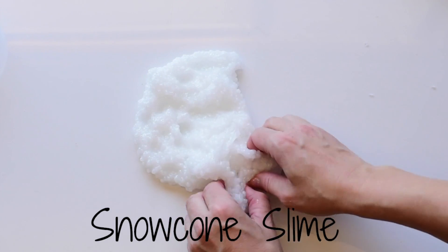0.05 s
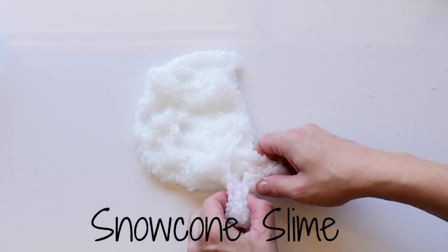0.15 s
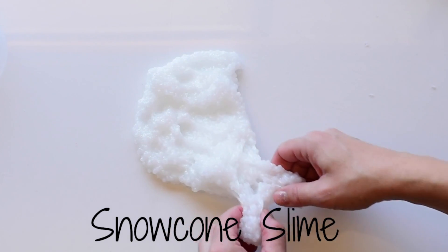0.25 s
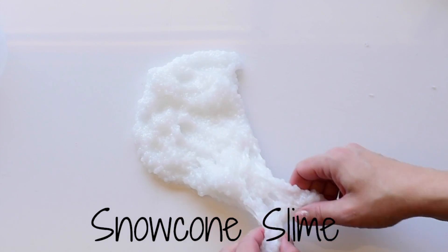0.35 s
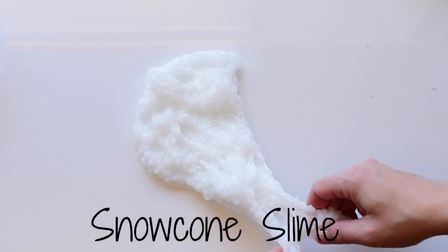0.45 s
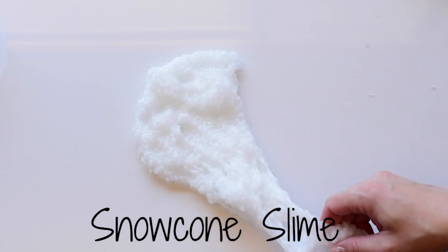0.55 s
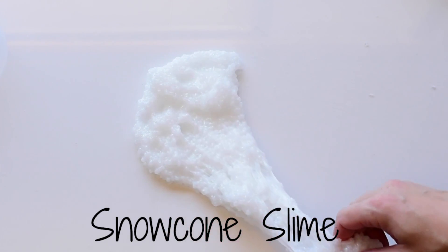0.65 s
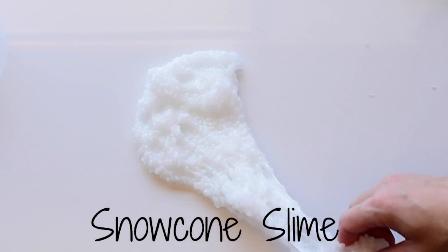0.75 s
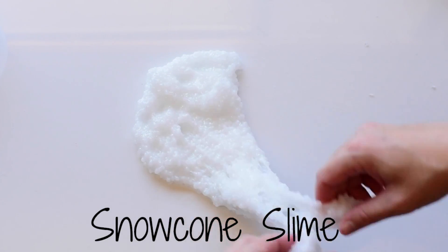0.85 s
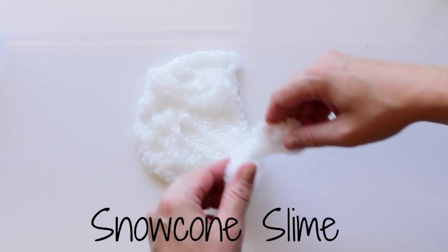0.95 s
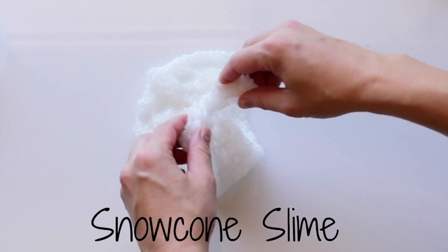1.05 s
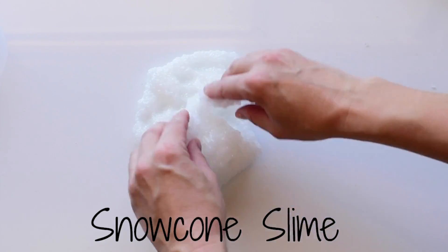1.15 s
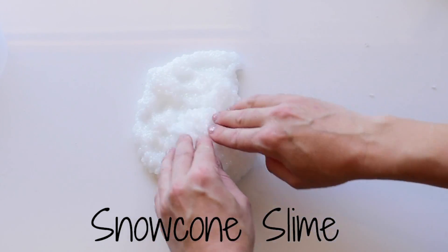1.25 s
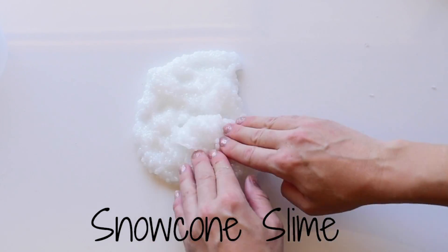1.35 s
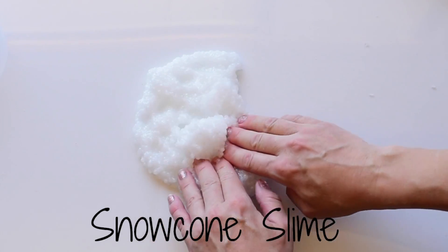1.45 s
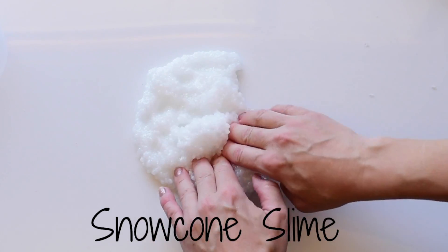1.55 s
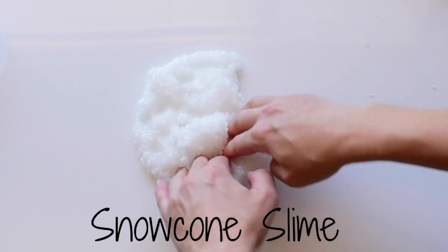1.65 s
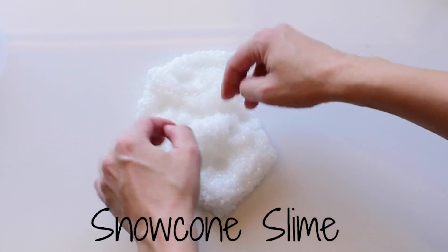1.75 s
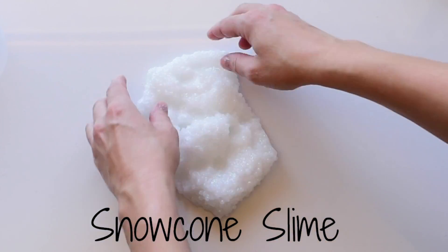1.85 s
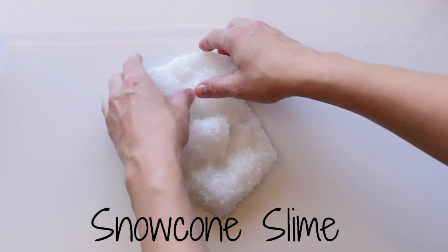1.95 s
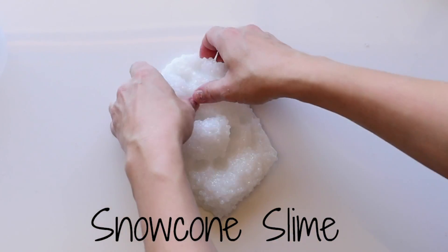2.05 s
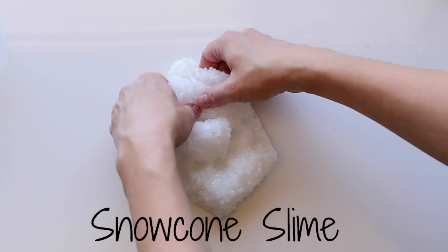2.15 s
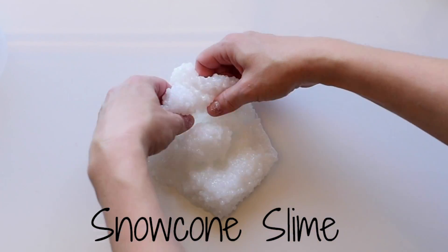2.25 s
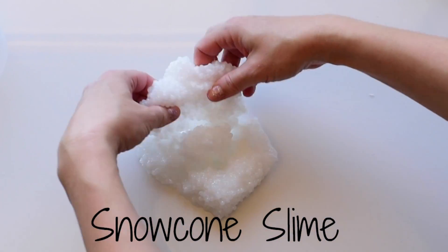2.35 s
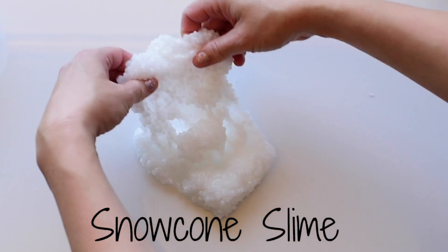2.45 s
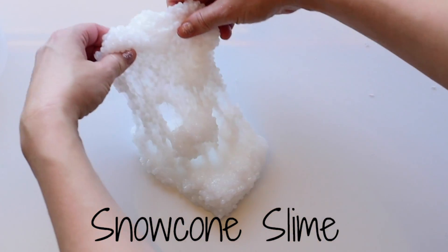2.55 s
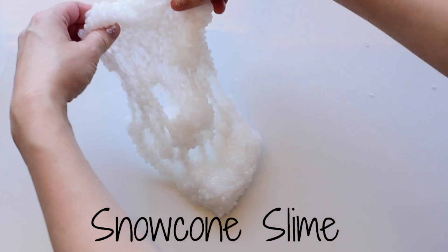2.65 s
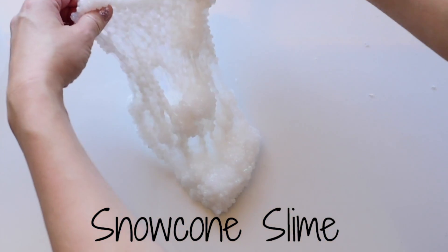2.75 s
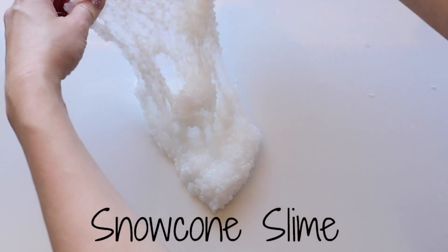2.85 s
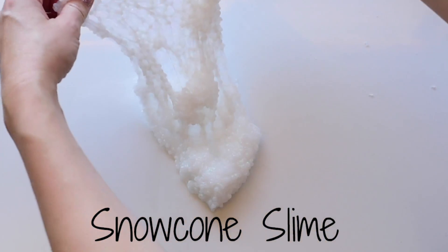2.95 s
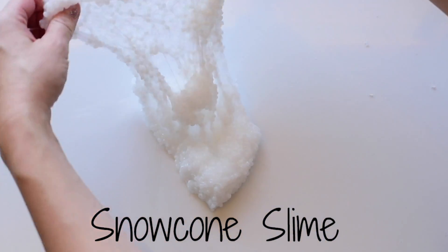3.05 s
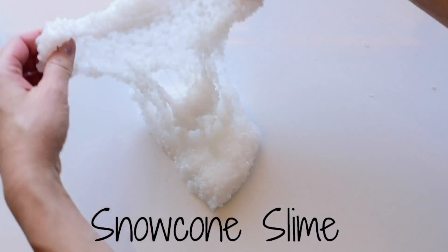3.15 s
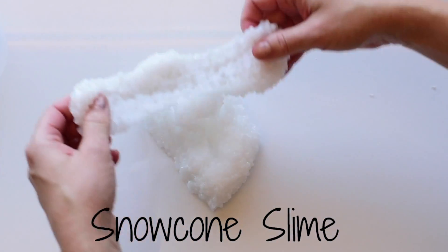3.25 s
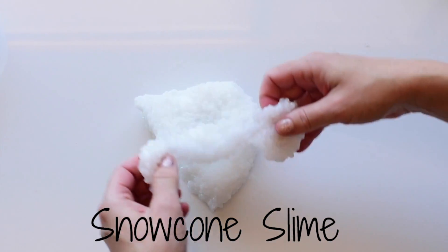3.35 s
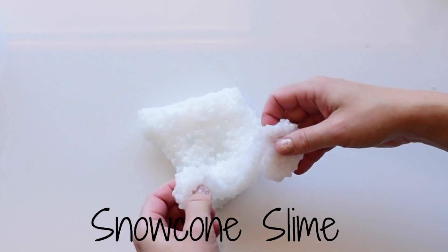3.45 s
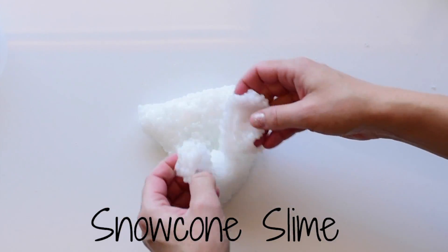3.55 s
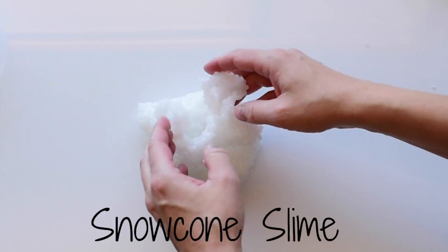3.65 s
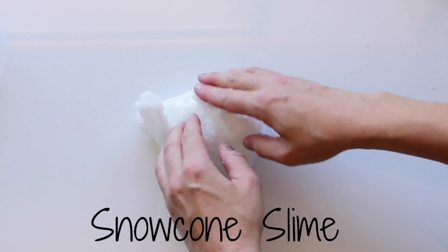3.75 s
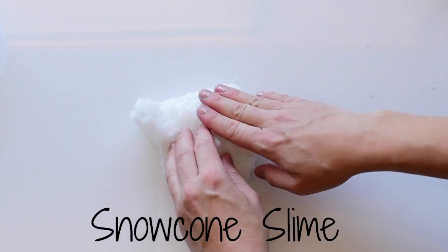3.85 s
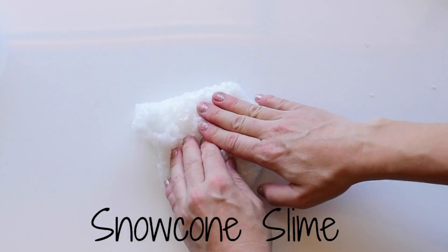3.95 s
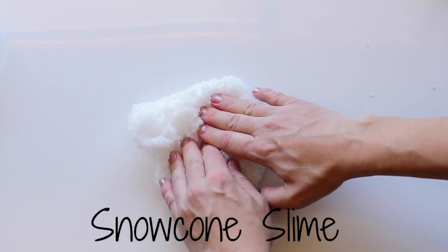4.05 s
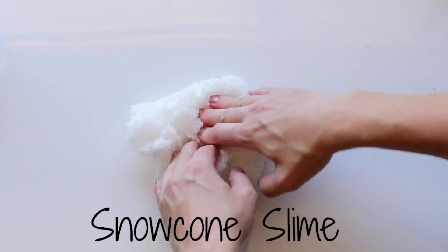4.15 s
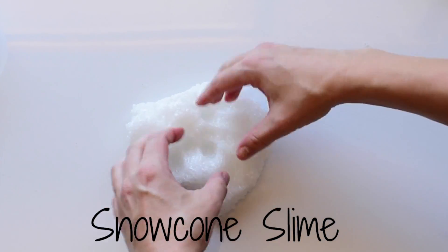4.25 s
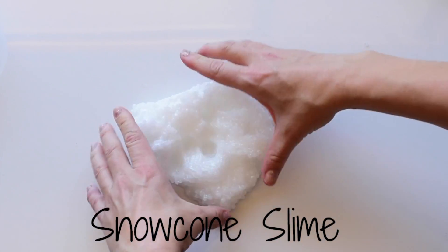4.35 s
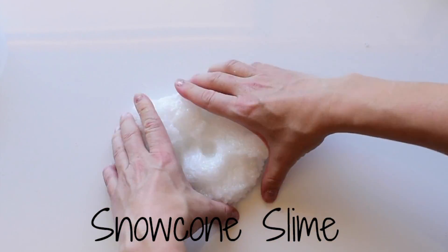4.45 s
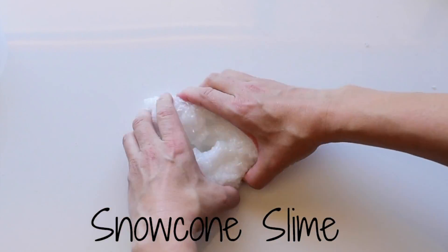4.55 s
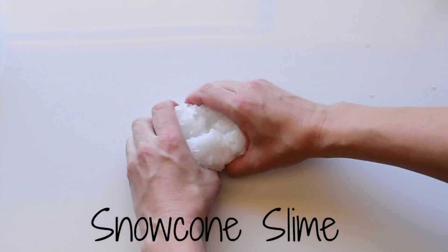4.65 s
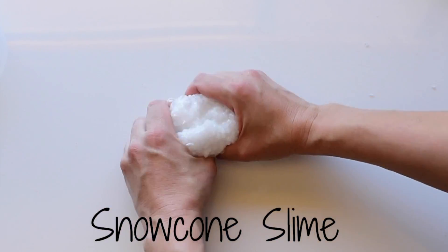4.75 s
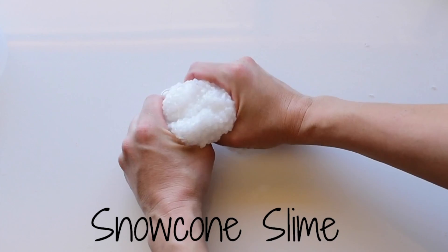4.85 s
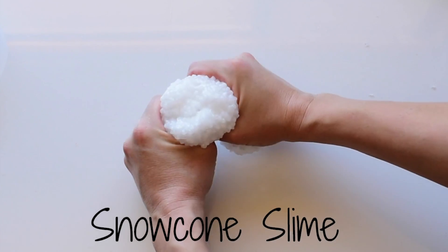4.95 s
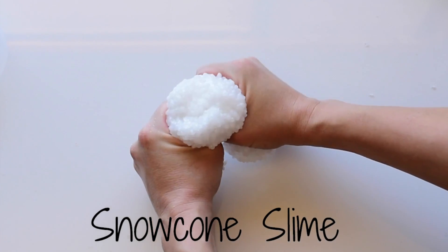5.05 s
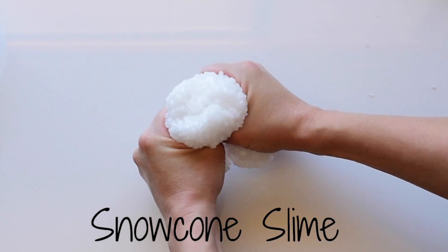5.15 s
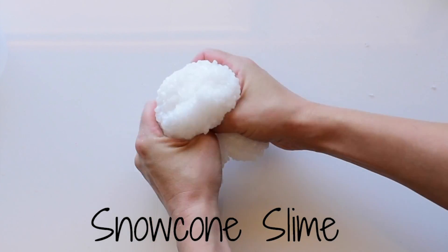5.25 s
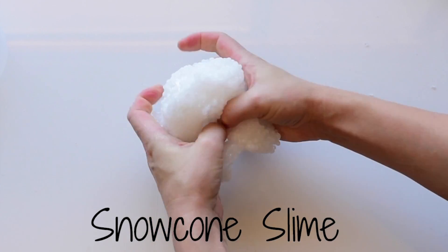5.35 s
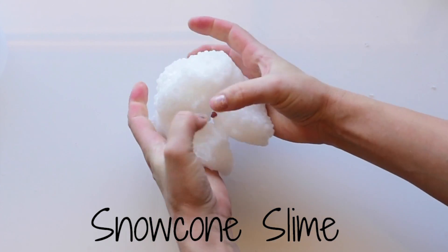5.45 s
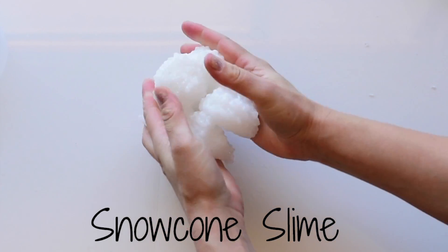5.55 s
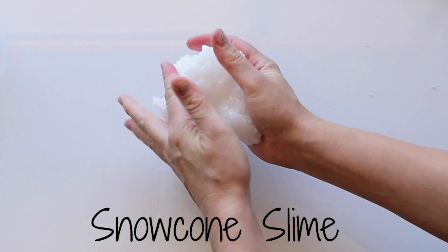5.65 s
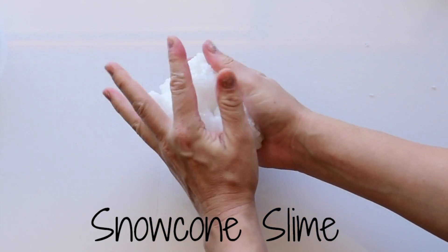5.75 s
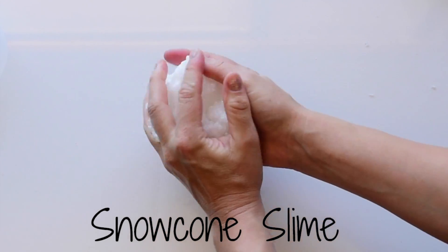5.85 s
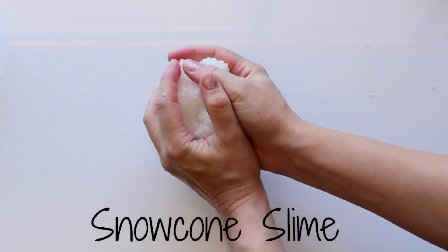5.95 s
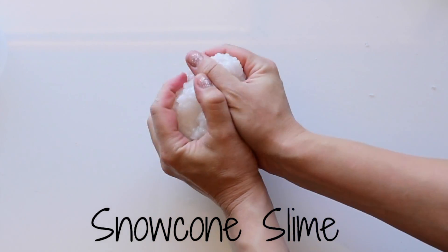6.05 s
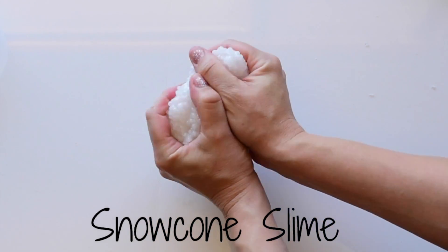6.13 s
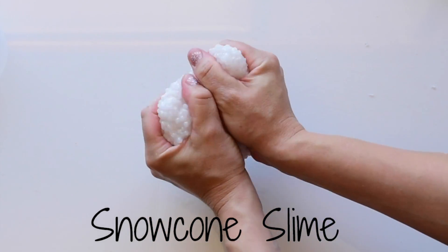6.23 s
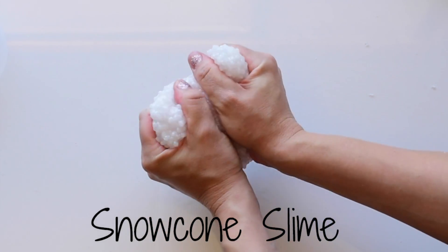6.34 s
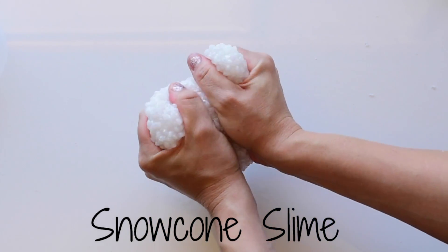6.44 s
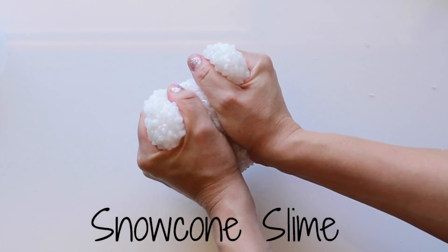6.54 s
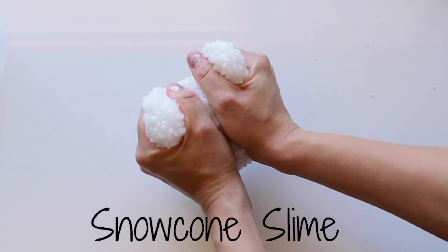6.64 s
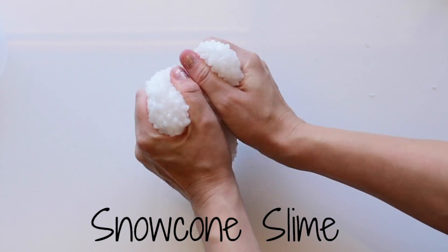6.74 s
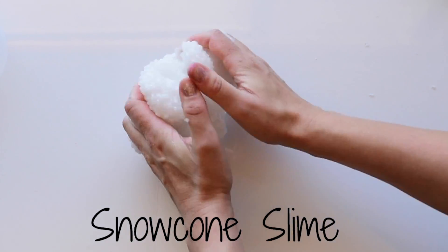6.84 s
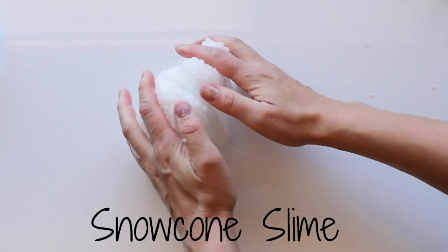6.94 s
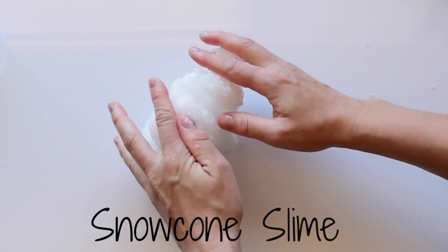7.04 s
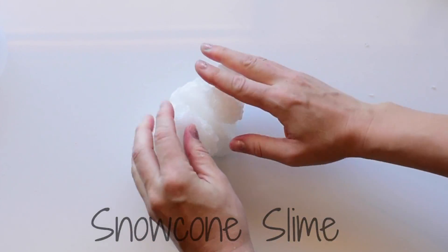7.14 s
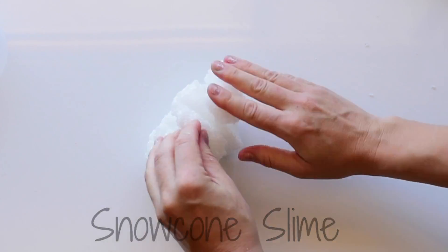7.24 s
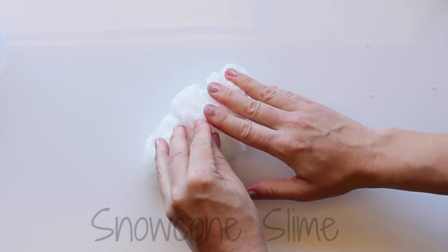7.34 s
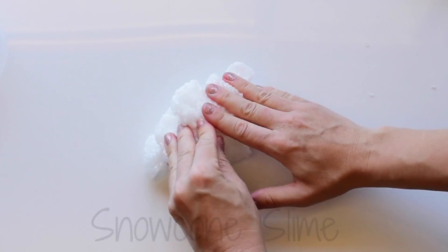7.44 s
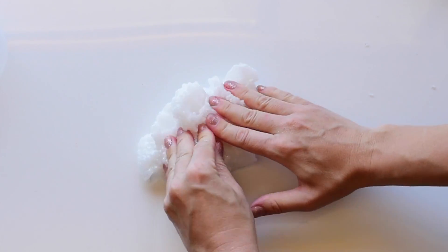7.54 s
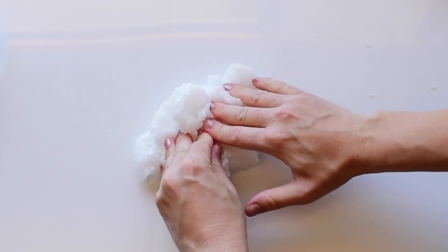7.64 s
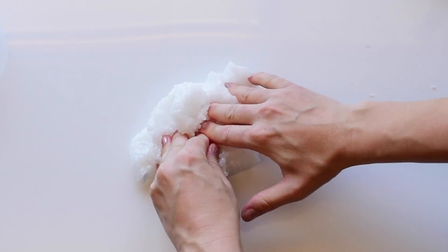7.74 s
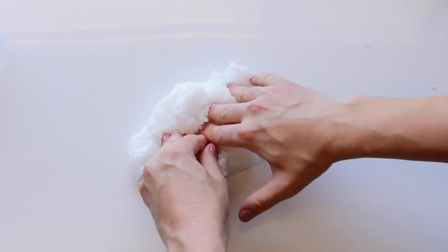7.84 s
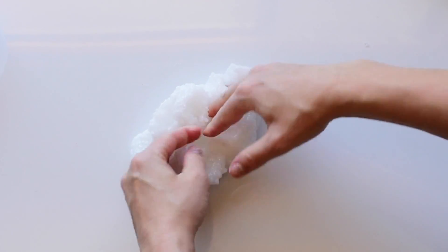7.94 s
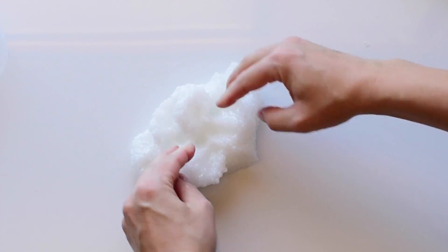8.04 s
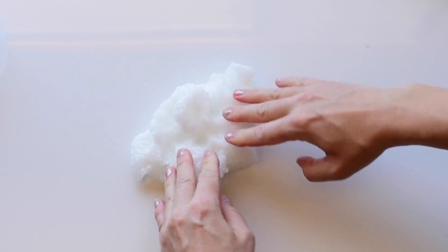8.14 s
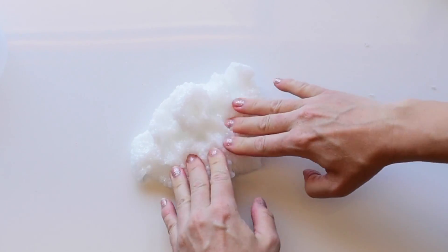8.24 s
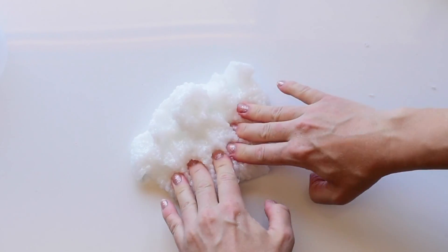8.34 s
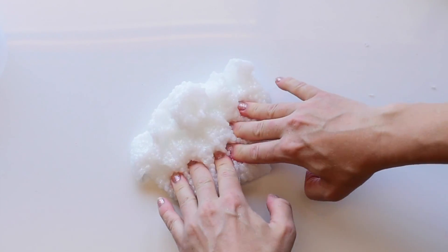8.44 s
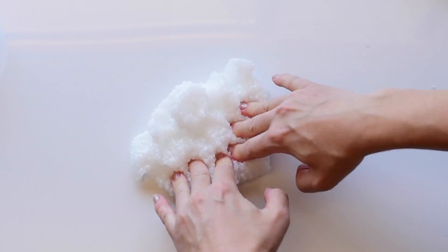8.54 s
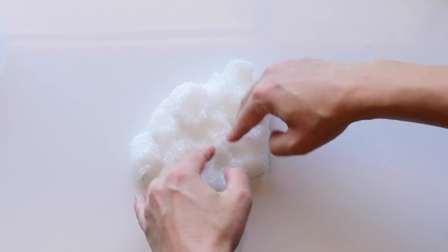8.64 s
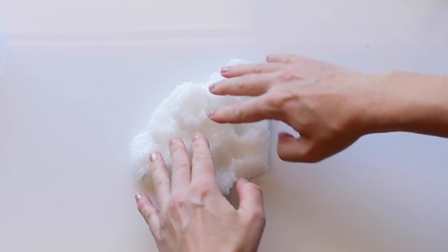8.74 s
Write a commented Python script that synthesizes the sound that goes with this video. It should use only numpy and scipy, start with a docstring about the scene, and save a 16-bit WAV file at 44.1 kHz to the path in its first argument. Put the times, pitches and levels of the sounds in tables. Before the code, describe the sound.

Hands stretch and squeeze crunchy bead-filled slime close up, with fine crackles, sharp snaps and wet squelches peaking in a loud burst midway.

```python
"""On a table in a small, hard room, two hands stretch, fold and squeeze a lump of crunchy, bead-filled slime.
Random clicks through damped resonances make the crackle of tiny air cells and a lower, wet squelch.
Bigger cells snap as rung bursts of noise, trapped pockets burst, air fizzes in and hands knock on the table.
A close stereo microphone adds hiss and bends the peaks; room noise, echo and a faint hum lie behind."""
import sys
import numpy as np
from scipy import signal
from scipy.fft import rfft, irfft
from scipy.io import wavfile
from scipy.ndimage import uniform_filter1d

SR = 44100
rng = np.random.default_rng(int(sys.argv[2]) if len(sys.argv) > 2 else 0)


def inscribe(sig):
    """Save sig as 16-bit PCM at rate SR to the path in sys.argv[1].

    A 1-D sig is mono; a 2-D sig holds one channel per row.
    Samples are clipped to [-1, 1] before scaling.
    """
    pcm = np.round(np.clip(np.atleast_2d(sig).T, -1, 1) * 32767)
    wavfile.write(sys.argv[1], SR, pcm.astype(np.int16))


N = 387638
TIME = np.arange(N) / SR

# strokes of the hands: (greatest effort [s], build-up [s], let-go [s], crackle level before trim [dB],
# wet squelch relative to the crackle [dB])
HAND_STROKES = [(0.03, .15, 0.16, -40.5, -13), (0.208, 0.2, 0.23, -39, -5), (0.88, .04, .06, -60, -12.5),
                (1.569, 0.232, 0.18, -44, -12), (1.768, .035, 0.032, -32.5, -16.5),
                (2.248, 0.28, .33, -30.5, -11), (2.589, 0.29, 0.32, -40.5, -7.5),
                (3.38, .05, 0.1, -56, -25.5), (3.72, 0.16, 0.22, -52, -10.5), (4.07, 0.18, 0.3, -42, -12.5),
                (4.271, 0.13, .08, -38, -10.5), (4.629, 0.088, 0.23, -32, -5.5),
                (4.771, 0.098, 0.27, -28.5, -11.5), (5.005, 0.1, .17, -17, -18.5),
                (5.13, 0.11, 0.078, -20.5, -22), (5.368, 0.12, 0.2, -36, -7.5),
                (5.66, 0.055, 0.057, -50, -4), (5.92, .25, .3, -48.5, -14), (6.23, 0.15, 0.18, -30, -13.5),
                (6.48, .13, 0.257, -34, -13), (6.67, .06, 0.064, -41.5, -13.5), (6.848, .09, .17, -33, -8),
                (7.42, 0.046, .05, -48.5, -13), (7.57, 0.055, 0.13, -44, -10),
                (7.78, 0.18, 0.12, -44.5, -13), (8.025, 0.095, 0.072, -35, -10), (8.38, 0.16, .24, -49, -9),
                (8.685, 0.057, 0.065, -34, -16)]
STROKE_DROP_DB, STROKE_CURVE = 22, 1.64  # fall over a build-up or let-go; 1 is a pointed peak, 2 a round one
RESTING_DB, RESTING_WET_DB = -66, -4.5  # the slime keeps settling between strokes
# outline of the dry crackle: (frequency [Hz], relative level [dB])
CRACKLE_SPECTRUM = [(500, -4.5), (2500, -7.5), (4800, -6.5), (6500, 1), (9800, 2), (12000, -3.5),
                    (15000, -10.5), (17000, -38)]
# outline of the wet squelch: (frequency [Hz], relative level [dB])
SQUELCH_SPECTRUM = [(100, -8), (280, -7), (700, -0.5), (1500, -2), (2600, -3), (4500, -3), (9000, -34.5)]
# low noise of the room: (frequency [Hz], relative level [dB])
ROOM_NOISE_SPECTRUM = [(20, -15.5), (50, -5), (100, -2), (280, -1), (430, -6.5), (560, -7.5), (720, -12.5),
                       (900, -15.5), (1700, -14), (3000, -32.5), (8000, -47)]
# thin hiss of the microphone: (frequency [Hz], relative level [dB])
MIC_HISS_SPECTRUM = [(4000, -12.5), (7500, -12.5), (9500, -4), (10170, 5.5), (10700, -9.5), (11600, -9.5),
                     (14000, -20), (16000, -31.5)]
ROOM_NOISE_DB, MIC_HISS_DB = -60.5, -57.5
# hands bump the table through the slime: (time [s], level before trim [dB], hardness [dB])
HAND_BUMPS = [(.01, -54, -6), (1.76, -48.5, 2.5), (1.963, -38, 13), (1.973, -35.5, -0.5),
              (2.076, -44.5, 10), (2.2, -43, -22), (2.259, -53.5, -4), (4.264, -51, -10),
              (4.502, -48.5, -13.5), (4.608, -45.5, -21.5), (6.911, -48.5, -15), (8.029, -49.5, -1),
              (8.698, -50, -1)]
# ring of the table: (frequency [Hz], level before hardness [dB], fall by 60 dB [s])
TABLE_MODES = [(74, -4.5, 0.1), (95.7, -2.5, 0.12), (126, 0.5, 0.061), (241, 1.5, 0.1), (375, -6.5, 0.055),
               (600, 8.5, 0.012), (657, -1, 0.027), (1200, -28, 0.0086)]
# the loudest air cells that snap: (time [s], level before trim and pan [dB], pitch [Hz])
LOUD_SNAPS = [(0.0312, -39, 6700), (0.1454, -35, 8370), (0.2332, -27.5, 9300), (0.2743, -30, 8850),
              (0.3499, -36, 7540), (0.4472, -40, 8500), (1.4803, -41, 5460), (1.5531, -35, 7800),
              (1.5875, -29, 7800), (1.7525, -31.5, 8100), (2.1387, -28, 6800), (2.3635, -17.5, 9600),
              (2.6021, -32.5, 5850), (2.6975, -36, 6600), (2.908, -44, 7000), (3.646, -41.5, 7700),
              (4.0022, -34, 7100), (4.067, -26.5, 6640), (4.1604, -32, 6460), (4.5315, -37.5, 8450),
              (4.6189, -28, 4140), (4.7488, -20.5, 7000), (4.7766, -20, 7200), (4.9293, -15, 6000),
              (4.9604, -16.5, 6800), (4.9848, -10, 8000), (4.9929, -12, 9000), (5.044, -10, 9800),
              (5.1104, -22, 6800), (5.1206, -18, 7600), (5.1257, -20, 7400), (5.1701, -10.5, 8900),
              (5.5689, -34, 7800), (6.1435, -25.5, 8550), (6.1588, -32, 8900), (6.2068, -26, 9300),
              (6.2518, -26, 9100), (6.2734, -20, 7800), (6.3852, -26.5, 10400), (6.4199, -14, 9500),
              (6.8393, -27, 7300), (6.9023, -40, 7100), (7.3982, -42.5, 7000), (7.4935, -32, 8300),
              (7.5322, -33.5, 6900), (7.5679, -36, 9550), (7.6813, -28.5, 8300), (7.8533, -35, 9650),
              (7.8885, -28, 8240), (8.0278, -25.5, 7200), (8.0435, -30, 9200), (8.3523, -27.5, 8900),
              (8.3708, -34, 10600), (8.4017, -35.5, 10500), (8.4488, -34.5, 7700), (8.4696, -35, 7800),
              (8.6713, -30, 7600)]
# the room's echo: (frequency [Hz], level relative to the direct sound [dB], fall by 60 dB [s],
# likeness of left and right [0-1])
ROOM_BANDS = [(146, -2.5, 0.97, 0.97), (500, -3, 0.17, 0.87), (1340, -2.5, 0.42, 0.3), (2450, -2, 0.32, 0),
              (6000, -5, 0.39, 0.55), (9500, -3, 0.24, 0.2), (13800, -1, 0.19, 0.5)]
# trapped air pockets that burst: (time [s], level before trim [dB], pitch [Hz])
POCKET_BURSTS = [(1.284, -49.5, 2440), (1.515, -40, 2200), (2.666, -37, 1830), (2.749, -52, 1690),
                 (2.806, -45.5, 1480), (4.072, -32.5, 2070), (4.619, -52, 2000), (4.749, -25, 1900),
                 (5.0604, -22, 1200), (5.0682, -15.5, 2800), (6.1737, -19, 490), (6.207, -25, 830),
                 (6.273, -26.5, 980), (6.42, -30.5, 1200)]
# air sucked in as the slime peels off the skin:
# (middle [s], spread [s], level before the jerks [dB], pitch [Hz])
AIR_SUCKS = [(2.268, 0.0075, -38, 2760), (4.704, 0.082, -47, 2850), (5.361, 0.011, -37, 2450),
             (6.807, 0.0098, -42, 2500)]
# a faint hum that comes and goes: (middle [s], spread [s], level [dB], pitch [Hz])
HUM_SWELLS = [(3.455, 0.25, -73, 693), (4.416, 0.05, -62, 663)]
# the lump is held above the table: (from [s], to [s])
LIFTED_SPAN = (4.7, 6.95)
TOP_HZ = 16100  # the recorder's upper limit


def undb(db):
    """Decibels to gain."""
    return 10 ** (np.asarray(db) / 20)


def unit(x):
    """Scale to an rms of one."""
    return x / np.sqrt(np.mean(x ** 2))


def walk(rate):
    """Random wander with a spread near one, taking `rate` new values a second."""
    knots = rng.standard_normal(int(rate * N / SR) + 2)
    return np.interp(TIME * rate, np.arange(len(knots)), knots)


def swell(s, spread_s, db):
    """A smooth bell-shaped rise and fall around time s."""
    return undb(db) * np.exp(-.5 * ((TIME - s) / spread_s) ** 2)


def stereo_noise(likeness, size):
    """White noise that is partly shared by left and right."""
    mid, side = rng.standard_normal((2, size))
    c = np.clip(likeness, 0, 1)
    return np.sqrt((1 + c) / 2) * mid + np.sqrt((1 - c) / 2) * np.array([side, -side])


def colour(x, spectrum):
    """Causal (minimum-phase) filter with the given frequency and dB outline."""
    size = 4096
    hz, db = np.transpose(spectrum)
    grid = np.maximum(np.fft.rfftfreq(size, 1 / SR), 1)
    cepstrum = irfft(np.log(undb(np.interp(np.log(grid), np.log(hz), db))))
    # folding the cepstrum puts the energy as early as possible
    cepstrum[1:size // 2] *= 2
    cepstrum[size // 2 + 1:] = 0
    response = irfft(np.exp(rfft(cepstrum)))
    return signal.fftconvolve(x, response[None], axes=1)[:, :N]


def resonate(x, hz, width_hz):
    """Two-pole resonance; a wider one dies away sooner."""
    hz, width_hz = min(hz, .45 * SR), min(width_hz, .3 * SR)
    return signal.lfilter(*signal.iirpeak(hz, hz / width_hz, fs=SR), x)


def panned(x, pan_db):
    """Place a sound by its left minus right level."""
    return x * undb(np.array([[.5], [-.5]]) * pan_db)


def add(out, s, sound):
    """Mix a sound in at time s."""
    start = max(int(s * SR), 0)
    out[:, start:start + sound.shape[-1]] += sound[..., :max(N - start, 0)]


def effort():
    """Each stroke builds up and lets go; returns the crackle level and the squelch relative to it, in dB."""
    t = TIME[::50]
    dry = undb(RESTING_DB) ** 2
    wet = undb(RESTING_DB + RESTING_WET_DB) ** 2
    for s, build_s, let_go_s, db, wet_db in HAND_STROKES:
        away = np.minimum(np.maximum((s - t) / build_s, (t - s) / let_go_s), 10)
        power = undb(db - STROKE_DROP_DB * away ** STROKE_CURVE) ** 2
        dry = dry + power
        wet = wet + power * undb(wet_db) ** 2
    crackle_db = np.interp(TIME, t, 10 * np.log10(dry))
    wet_db = np.interp(TIME, t, 10 * np.log10(wet / dry))
    return crackle_db, wet_db


def cells(db, wet_db, pitches_hz, spectrum, rate, growth, scatter_db, damping, lag_s, wet_growth=.6):
    """Tiny cells of many sizes burst at random; harder work and wetter slime burst more of them."""
    busier_db = growth * (db - db.mean()) + wet_growth * (wet_db - wet_db.mean())
    per_sample = rate * undb(busier_db) / SR / len(pitches_hz)
    out, chance = np.zeros((2, N)), rng.standard_normal((2, N))
    for hz in pitches_hz:
        at = np.flatnonzero(rng.random(N) < per_sample)
        strength, place = chance[:, at]
        clicks = np.zeros((2, N))
        # each cell lies at its own distance from the two capsules
        lag = np.round(lag_s * SR * place).astype(int)
        at_right = np.clip(at + lag, 0, N - 1)
        clicks[0, at] = clicks[1, at_right] = undb(scatter_db * np.minimum(strength, 2))
        out += resonate(clicks, hz, damping * hz)
    out = colour(out, spectrum)
    # the bursts of any one moment share the work that the hand puts in
    power = uniform_filter1d(np.mean(out ** 2, axis=0), size=2200)
    power = uniform_filter1d(power, size=1500)
    return out / np.sqrt(np.abs(power) + power.mean() / 1000) * undb(db)


def kneading(crackle_db, wet_db, cluster_rate=55, cluster_db=4.5, trim_db=-3.5):
    """Fine dry crackle among the beads, a wetter, lower squelch, and fizzing sucks of air."""
    # the slime gives way in little jerks, which make the level uneven
    jerks = undb(cluster_db * walk(cluster_rate))
    crackle = cells(crackle_db + trim_db, wet_db, np.geomspace(2500, 13000, num=12), CRACKLE_SPECTRUM,
                    rate=1300, growth=0.4, scatter_db=0.0, damping=0.39, lag_s=.00005)
    squelch = cells(crackle_db + wet_db + trim_db, wet_db, np.geomspace(450, 3600, num=8), SQUELCH_SPECTRUM,
                    rate=550, growth=.45, scatter_db=5.5, damping=0.51, lag_s=.00006)
    return jerks * (crackle + squelch + air_sucks())


def background():
    """Steady low room noise and thin microphone hiss, both shaped from white noise, with the faint hum."""
    rumble = unit(colour(stereo_noise(0.65, N), ROOM_NOISE_SPECTRUM))
    hiss = unit(colour(stereo_noise(0.043, N), MIC_HISS_SPECTRUM))
    return undb(ROOM_NOISE_DB) * rumble + faint_hum() + undb(MIC_HISS_DB) * hiss


def room(dry, delay_s=0.00055, build_s=0.00022):
    """Bare walls close by return a dense noise tail, mostly shared in the bass and wider in the treble."""
    t = TIME[:SR * 3 // 4]
    grid = np.log(np.maximum(np.fft.rfftfreq(len(t), 1 / SR), 1))
    centres = np.log(np.array(ROOM_BANDS)[:, 0])
    onset = 1 - np.exp(-np.maximum(t - delay_s, 0) / build_s)
    response = 0
    for band, (hz, db, t60, likeness) in zip(np.eye(len(ROOM_BANDS)), ROOM_BANDS):
        fade = unit(onset * np.exp(-np.log(1000) * t / t60)) / np.sqrt(len(t))
        # neighbouring bands overlap so that their powers add up to one
        share = np.sqrt(np.interp(grid, centres, band))
        noise = irfft(share * rfft(stereo_noise(likeness, len(t))), len(t))
        response = response + undb(db) * fade * noise
    return signal.fftconvolve(dry.mean(axis=0)[None], response, axes=1)[:, :N]


def moving_room(dry, count=4):
    """Sounds come from changing spots in the lump, and each spot has its own echo pattern."""
    spot = np.repeat(rng.integers(count, size=N // 600 + 1), 600)[:N]
    return sum(room(dry * uniform_filter1d(1. * (spot == k), size=200)) for k in range(count))


def bumps(hard_hz=500, press_s=0.023, gain_db=-11):
    """A hand lands and settles; a hard landing is quick and rings the table's upper modes."""
    out, t = np.zeros((2, N)), TIME[:SR // 3]
    for s, db, hard_db in HAND_BUMPS:
        ring = 0
        for hz, mode_db, t60 in TABLE_MODES:
            level_db = mode_db + hard_db * min(hz / hard_hz, 1) - 60 * t / t60
            ring = ring + undb(level_db) * np.cos(2 * np.pi * hz * t)
        push = rng.standard_normal(len(t)) * np.exp(-t / (press_s * undb(-hard_db / 2)))
        # soft flesh takes the top off
        top_hz = np.clip(2500 * undb(hard_db), 120, SR / 4)
        flesh = signal.butter(2, [62, top_hz], "band", fs=SR)
        knock = signal.lfilter(*flesh, signal.fftconvolve(push, ring)[:len(t)])
        add(out, s, unit(knock) * undb(db + gain_db))
    return out


def small_snaps(crackle_db, count=90, resting_db=-55, follow=0.62, scatter_db=1.0, centre_hz=6800, octaves=0.51):
    """Lesser cells snap at random, louder with harder work: rows (time [s], level before trim [dB], pitch [Hz])."""
    s = rng.random(count) * TIME[-1]
    strength, pitch = rng.standard_normal((count, 2)).T
    work_db = np.interp(s, TIME, crackle_db) - RESTING_DB
    db = resting_db + follow * work_db + scatter_db * strength
    return list(zip(s, db, centre_hz * 2 ** (octaves * pitch)))


def snaps(rows, width_hz=4800, tear_s=0.00077, tear=0.36, edge=0.31, gain_db=-3.5, pan_db=-2, side_db=-5):
    """A cell wall tears in about a millisecond and rings the little cavity behind it."""
    out, t = np.zeros((2, N)), TIME[:400]
    for s, db, hz in rows:
        rip = tear * rng.standard_normal((2, len(t))) * np.exp(-t / tear_s)
        rip[0, 0] = 1  # the first crack goes to the shared signal; the rest scatters off the fingers
        cavity = resonate(resonate(rip, hz, width_hz), hz, width_hz)
        mid, side = cavity + edge * resonate(rip, 8270, 9000)
        sound = unit(mid) + undb(side_db) * unit(np.array([side, -side]))
        add(out, s, panned(unit(sound) * undb(db + gain_db), pan_db))
    return out


def pockets(damping=0.9, splutter=0.28, splutter_s=0.0026, low_hz=240, crack=0.99, gain_db=-8):
    """A big pocket lets go with one broad pulse and a short wet splutter; it is too small to radiate bass."""
    out, t = np.zeros((2, N)), TIME[:800]
    radiation = signal.butter(2, low_hz, "high", fs=SR)
    for s, db, hz in POCKET_BURSTS:
        wet_noise = splutter * rng.standard_normal(len(t)) * np.exp(-t / splutter_s)
        burst = signal.lfilter(*radiation, (t == 0) + wet_noise)
        cavity = unit(resonate(resonate(burst, hz, damping * hz), hz, 5400))
        skin = unit(resonate(burst, 2200, 3000))  # the tearing skin adds a crisp edge
        add(out, s, unit(cavity + crack * skin) * undb(db + gain_db))
    return out


def air_sucks():
    """Air drawn in as slime peels off the skin: swells of noise through one broad resonance each."""
    out = 0
    for s, spread_s, db, hz in AIR_SUCKS:
        fizz = unit(resonate(stereo_noise(0.17, N), hz, hz / 4))
        out = out + swell(s, spread_s, db) * fizz
    return out


def faint_hum():
    """A hum that comes and goes; noise through two narrow resonances wavers around one pitch."""
    out = 0
    for s, spread_s, db, hz in HUM_SWELLS:
        tone = resonate(resonate(rng.standard_normal(N), hz, 18), hz, 20)
        out = out + swell(s, spread_s, db) * unit(tone)
    return out


def table_echo(x, delay_s=.0035, db=-5):
    """While the lump is lifted, each snap comes back once more from the table top."""
    lifted = (TIME > LIFTED_SPAN[0]) & (TIME < LIFTED_SPAN[1])
    return undb(db) * np.roll(x * lifted, int(delay_s * SR), axis=1)


def scene():
    """Slime and table, heard directly and through the room."""
    crackle_db, wet_db = effort()
    pops = snaps(list(LOUD_SNAPS) + small_snaps(crackle_db))
    knocks = bumps()
    slime = kneading(crackle_db, wet_db) + pops + table_echo(pops) + pockets()
    return slime + moving_room(slime) + knocks + room(knocks) + background()


def record(dry, bend=0.011):
    """The microphone bends loud peaks lopsidedly, which adds a low thud; the recorder clips and cuts the top."""
    overloaded = np.clip(dry - bend * dry ** 2, -1, 1)
    top_cut = signal.ellip(8, .2, 70, TOP_HZ, fs=SR, output="sos")
    return signal.sosfilt(top_cut, overloaded)


dry = scene()
out = record(dry)
inscribe(out)
```